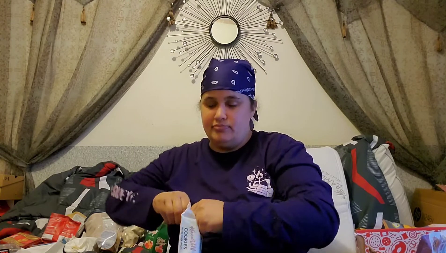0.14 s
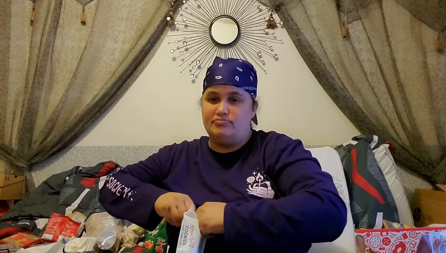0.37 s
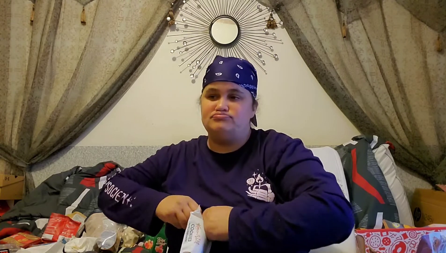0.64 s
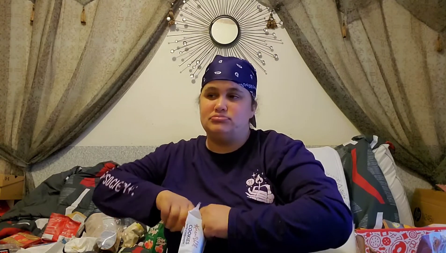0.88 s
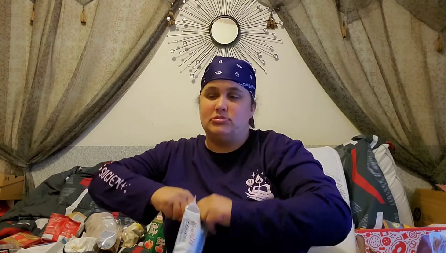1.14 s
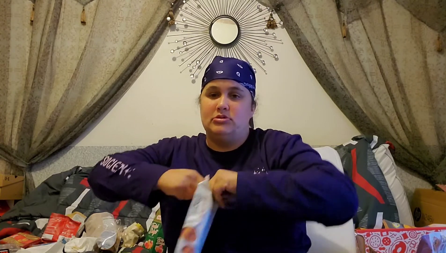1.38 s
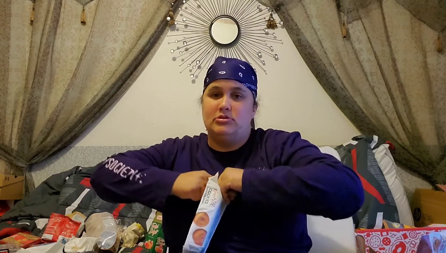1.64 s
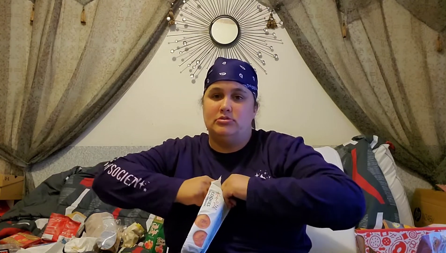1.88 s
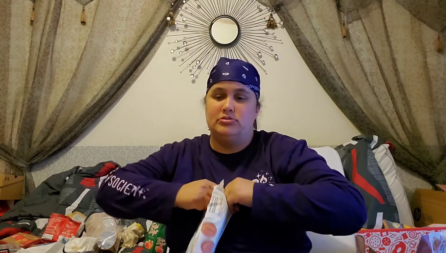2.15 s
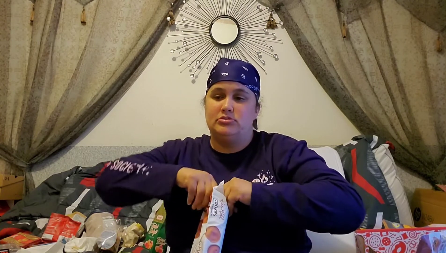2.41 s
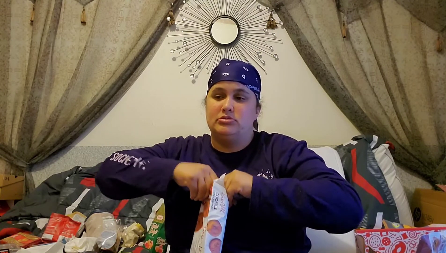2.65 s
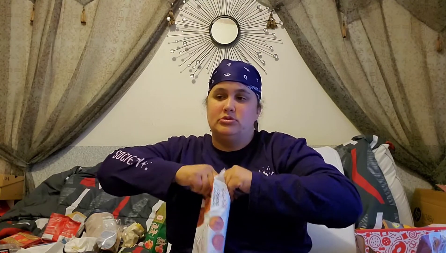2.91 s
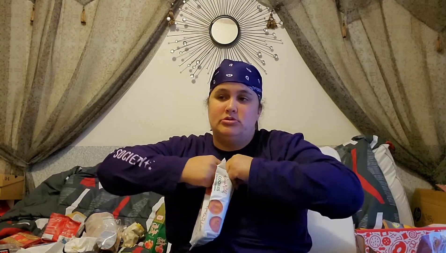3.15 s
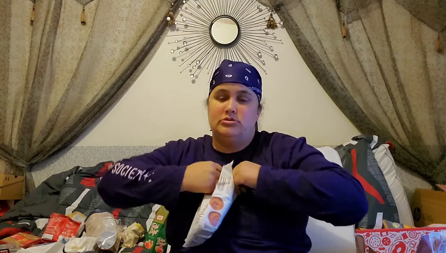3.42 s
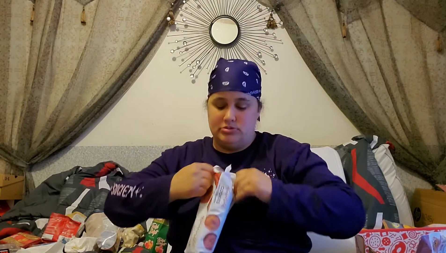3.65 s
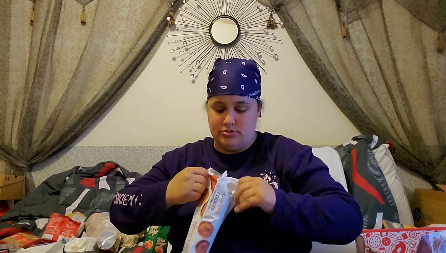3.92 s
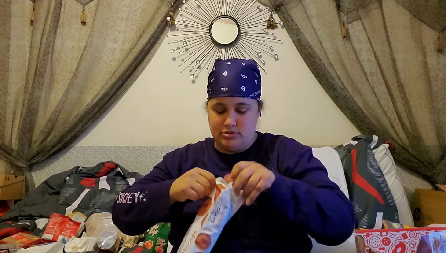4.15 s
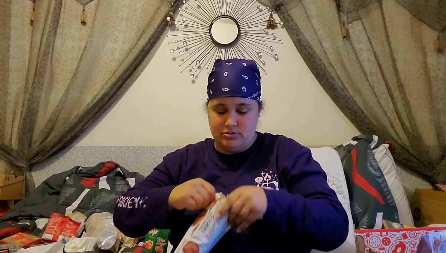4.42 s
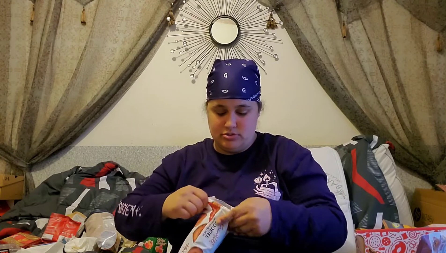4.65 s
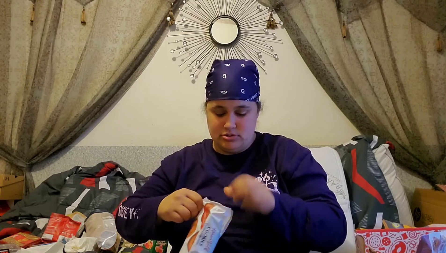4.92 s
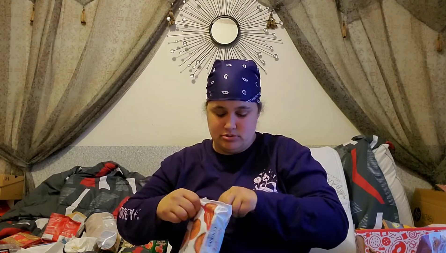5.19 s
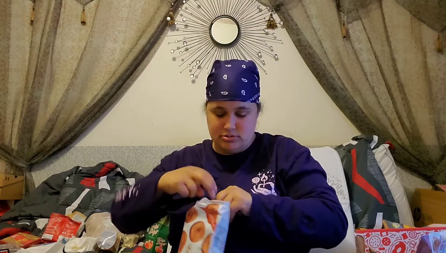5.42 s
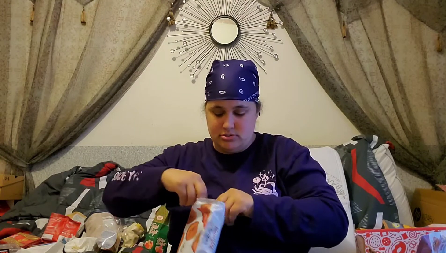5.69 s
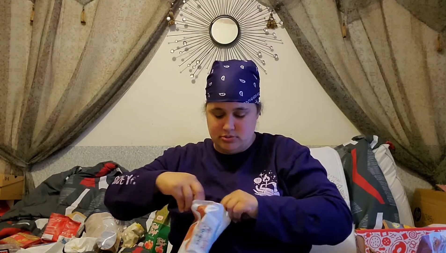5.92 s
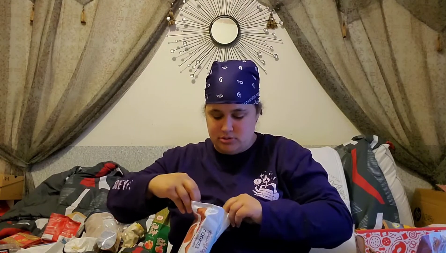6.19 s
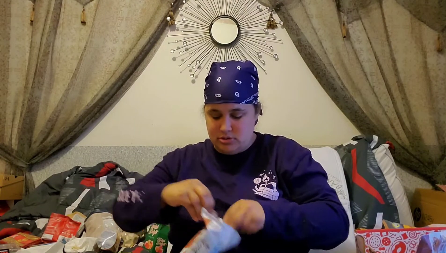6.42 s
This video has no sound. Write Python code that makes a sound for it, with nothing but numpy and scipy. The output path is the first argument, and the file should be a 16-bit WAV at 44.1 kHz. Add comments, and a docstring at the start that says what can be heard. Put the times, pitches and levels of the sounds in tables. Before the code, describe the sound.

Two hands work a crisp plastic snack bag close to small stereo microphones in a quiet, soft-furnished room. From 0 to 1 s, light rustling is broken by hard snaps near 0.25, 0.6 and 0.9. After a brief lull, crinkling thickens from 1.15 s, with bright crackles around 1.4 to 1.5 and a strong crack at 2.2. Rustle eases around 2.6 to 2.8, then a vigorous burst comes at 3.0 to 3.1, followed by dense, coarse crackling from 3.3 to 3.8. A near-pause at 3.9 leads to steady kneading and tearing until 4.95. Another gap falls around 5.05 to 5.2; crinkling resumes, dips at 5.5, and builds to sharp cracks around 6.0. It then thins to sparse, weak rustles by 6.5. Soft low pops of the bag wall recur throughout, with a short room tail, faint steady noise and a subdued, swelling deep rumble.

```python
"""Two hands knead, pull and tear a plastic snack bag in a quiet, curtained room.
Loud and small creases strike banks of short film resonances; loud ones also ring a freed panel.
Pops of the bag wall are low dying sines. A close surface echoes the bag and a diffuse tail follows it.
Below lie faint steady noise and a swelling rumble, both filtered noise."""
import sys
import numpy as np
from scipy import signal
from scipy.fft import rfft, irfft
from scipy.io import wavfile

SR = 44100
rng = np.random.default_rng(int(sys.argv[2]) if len(sys.argv) > 2 else 0)


def transcribe(signal):
    """Save signal, clipped to [-1, 1], as a 16-bit WAV file at the path in sys.argv[1]."""
    frames = np.atleast_2d(signal).T
    limited = np.clip(frames, -1, 1)
    pcm = np.round(limited * 32767).astype(np.int16)
    wavfile.write(sys.argv[1], SR, pcm)


def boost_factor(decibels):
    """Convert a level in decibels to a linear amplitude factor."""
    exponent = np.asarray(decibels, float) / 20
    return 10 ** exponent


N = 289275

# loud crease snaps: t/s, level/dB, panel ring f/Hz, bright tick re snap/dB, aftershock crackle re snap/dB
SNAPS = [(0.024, -18, 1470, -3, -28), (0.075, -31, 1420, -13, -27), (0.14, -28, 6630, 3.5, -17),
         (0.195, -24, 1480, -24, -20), (0.208, -26, 1380, -24, -23), (0.228, -9, 2490, -23, -25),
         (0.255, -7, 4340, -18, -23), (0.343, -26.5, 1010, -10, -39), (0.382, -29.5, 1490, -17, -33),
         (0.427, -29.5, 1500, -26, -33), (0.489, -30, 2890, -17, -22), (0.54, -22.5, 1500, -17, -30),
         (0.57, -29, 3970, -18, -14), (0.584, -12.5, 1580, -22, -18.5), (0.643, -10.5, 3000, -24, -27),
         (0.673, -25, 942, -20, -23), (0.7, -23, 2250, -23, -31), (0.769, -35, 1390, -19, -25),
         (0.786, -23.5, 1500, -27.5, -21.5), (0.853, -27, 4060, -19, -18),
         (0.905, -12.5, 1470, -11.5, -27.5), (0.934, -17.5, 4420, -19, -13.5), (1.054, -34, 2390, -19, -41),
         (1.151, -27, 1510, -4.5, -12), (1.2, -26.5, 1090, -4, -14), (1.208, -23, 1090, -11, -15),
         (1.226, -27.5, 2470, -11, -18), (1.265, -22, 940, -17, -16.5), (1.328, -25, 1110, -15, -23),
         (1.351, -20.5, 3340, -12, -30), (1.397, -10.5, 5200, -13, -28.5), (1.405, -16, 5240, -5, -21),
         (1.442, -15.5, 930, -18, -18), (1.46, -22.5, 2260, -3, -21), (1.475, -10, 5600, -16, -22.5),
         (1.521, -17, 2250, -7.5, -18.5), (1.586, -28, 1920, -1, -11.5), (1.647, -17.5, 834, -6.5, -19),
         (1.679, -17, 880, -3.5, -19), (1.692, -17, 1990, -12, -33), (1.757, -18, 5100, -3.5, -28),
         (1.775, -19, 1220, -20, -23), (1.823, -21, 3050, -9.5, -19.5), (1.847, -19, 1150, -20, -31),
         (1.912, -25, 5300, -7, -33), (1.953, -29, 1800, -13, -30), (1.978, -13, 1800, -11, -23),
         (2.022, -21.5, 5960, -5, -21), (2.1, -39, 1300, -9, -23), (2.098, -22.5, 1560, -8, -23),
         (2.112, -20.5, 1830, -28, -31), (2.182, -25.5, 1480, -19, -14), (2.189, -24, 1230, -18, -23),
         (2.198, -18.5, 2270, -22, -15.5), (2.229, -6, 2280, -30, -17.5), (2.285, -22.5, 4200, -5, -19),
         (2.316, -18.5, 1250, -10, -17.5), (2.328, -13.5, 1020, -27, -19.5), (2.334, -15, 576, -5, -23),
         (2.377, -20, 2720, -1, -29), (2.43, -13.5, 2490, -6.5, -19), (2.512, -18.5, 2300, -30, -14.5),
         (2.53, -11.5, 2130, -19.5, -15.5), (2.598, -18.5, 2200, -47, -14), (2.718, -25, 2350, -19, -35),
         (2.808, -30, 2430, -19, -26), (2.858, -28, 3120, -8, -17), (2.871, -22, 5580, -10, -20.5),
         (2.881, -24.5, 2180, -14, -19), (2.892, -23, 1120, -16, -21), (2.92, -22, 2250, -15, -24),
         (2.956, -32, 1400, 2, -15), (2.991, -19, 1400, -11, -33), (3.003, -12.5, 1200, -45, -24),
         (3.024, -15.5, 1160, -29, -24), (3.044, -14.5, 1740, -19, -19.5), (3.077, -4.5, 3460, -29, -22.5),
         (3.128, -15.5, 2300, -44, -24), (3.179, -25.5, 1250, -5, -29.5), (3.238, -24.5, 5310, -5, -18.5),
         (3.271, -17, 2130, -14, -18), (3.314, -20, 1020, -4, -20.5), (3.341, -10, 990, -32, -15.5),
         (3.478, -21.5, 580, -5, -20), (3.494, -19.5, 1030, -18, -23), (3.512, -19, 985, -18, -10),
         (3.54, -14.5, 3170, -12, -17.5), (3.558, -18, 1450, -14, -39), (3.611, -19, 1110, -22, -19),
         (3.63, -23, 4150, -21, -30), (3.69, -25, 1450, -19, -23), (3.748, -18.5, 1290, -17, -21),
         (3.752, -16.5, 614, -12, -19), (3.782, -18, 2450, -10, -17), (3.797, -10, 1140, -18, -24),
         (3.816, -14, 1110, -7, -36), (3.916, -34.5, 920, -9, -23), (3.961, -48, 1460, -19, -29),
         (4.039, -17, 1170, -21, -23), (4.055, -24, 1470, -12, -17), (4.111, -15.5, 2750, -18, -26),
         (4.155, -18, 4100, -10, -24.5), (4.191, -22.5, 3400, -30, -33), (4.245, -29, 5100, -7, -13.5),
         (4.272, -27, 2130, -18, -29), (4.352, -18, 2330, -9, -24.5), (4.364, -18.5, 2340, -10, -22),
         (4.41, -15.5, 3100, -8, -25.5), (4.42, -19.5, 2590, -1.5, -31), (4.471, -16, 2070, -26, -33),
         (4.5, -19, 1210, -7, -17), (4.526, -16, 2300, -13, -20), (4.568, -11.5, 620, -22, -26),
         (4.619, -20, 2220, -1.5, -22), (4.64, -19, 2220, -20, -16), (4.697, -17, 2240, -13, -20.5),
         (4.734, -24, 1230, -12, -14), (4.746, -15.5, 1210, -17, -22), (4.766, -18.5, 1290, -15, -32),
         (4.86, -15.5, 2150, -18, -27), (4.879, -17, 2310, -28, -11), (4.934, -21, 1320, -22, -22),
         (4.95, -17, 1860, -34, -19.5), (4.992, -29, 1460, -30, -30), (5.087, -37, 6340, -4.5, -23),
         (5.208, -23, 1200, -20, -21.5), (5.247, -18.5, 4250, -26, -24), (5.253, -18.5, 4080, -25, -16),
         (5.292, -18.5, 2290, -18, -16.5), (5.327, -17, 2270, -19, -15), (5.349, -15.5, 1190, -27, -17),
         (5.39, -18.5, 1260, -17, -22.5), (5.418, -15, 1210, -13, -23), (5.46, -17, 910, -18, -23.5),
         (5.546, -34, 1310, -27, -23), (5.607, -28.5, 2230, -8, -21.5), (5.639, -23, 4220, -15, -19),
         (5.651, -26, 2020, 1, -15), (5.691, -16.5, 2070, -34, -23), (5.702, -16, 1180, -14, -21),
         (5.749, -15, 1470, -7.5, -27.5), (5.787, -25, 5130, -8, -18), (5.828, -17, 1230, -24, -17.5),
         (5.838, -15, 1310, -24, -28), (5.885, -15, 4360, -14, -23), (5.915, -27, 1030, -8, -23),
         (5.98, -13, 3230, -29, -19.5), (5.994, -10, 1190, -25, -18), (6.023, -7.5, 894, -31, -16),
         (6.062, -14, 1200, -14, -17.5), (6.099, -19.5, 2200, -7, -19), (6.11, -17.5, 1890, -17, -17.5),
         (6.179, -28, 2240, -21, -36), (6.198, -25.5, 1040, -27, -35), (6.229, -32, 2420, -15, -17),
         (6.258, -22, 1220, -26, -33), (6.383, -22, 1100, -37, -22), (6.465, -25, 1240, -21, -21),
         (6.543, -30.5, 2440, -17, -16)]
# bag wall pops, pushing the air inside: t/s, level/dB, f/Hz
POPS = [(0.026, -28, 360), (0.192, -36, 430), (0.254, -40, 444), (0.426, -40, 372), (0.543, -44, 366),
        (0.588, -24, 342), (0.674, -21, 347), (0.695, -23, 372), (0.91, -46, 363), (1.206, -35, 437),
        (1.414, -41, 350), (1.45, -35, 417), (1.477, -26.5, 375), (1.647, -36, 299), (1.678, -24.5, 385),
        (1.901, -36, 363), (2.024, -37, 363), (2.093, -28.5, 428), (2.182, -37, 370), (2.338, -33, 471),
        (2.534, -31, 385), (2.957, -51, 390), (3.0, -40, 386), (3.022, -27, 288), (3.043, -21.5, 374),
        (3.079, -22.5, 380), (3.127, -32, 400), (3.15, -41, 382), (3.215, -46, 420), (3.271, -26.5, 437),
        (3.342, -26, 422), (3.476, -28, 392), (3.516, -30, 418), (3.61, -31, 382), (3.755, -35, 398),
        (4.041, -45, 415), (4.271, -28.5, 385), (4.339, -30.5, 433), (4.384, -32, 385), (4.452, -35, 447),
        (4.568, -34, 390), (4.746, -30.5, 430), (4.873, -31, 427), (4.951, -33, 390), (5.117, -37.5, 369),
        (5.335, -29.5, 355), (5.46, -47, 393), (5.69, -25.5, 423), (5.838, -35, 395), (5.975, -39, 439),
        (6.025, -23.5, 385), (6.099, -25, 405), (6.16, -34, 363), (6.467, -41.5, 380)]
# left-right likeness: f/Hz, likeness/1
LIKENESS = [(150, 0.88), (350, 1), (640, 0.84), (1400, 0.59), (3100, 0.31), (6800, 0.043), (15000, 0.011)]

BANDS_HZ = np.geomspace(150, 15500, 38)
TRAVEL_S = 0.0005   # way to the microphones
SHORTEST_T60_S = 0.00097   # added to every film ring's decay
MIDDLE_HZ = 1800   # reference for ring pitch in octaves


def rms_one(x):
    """Scale to rms 1."""
    return x / np.sqrt(np.mean(x ** 2) + 1e-20)


def at_hz(points, hz):
    """Read a (Hz, value) table on a log-frequency axis."""
    table_hz, value = np.transpose(points)
    return np.interp(np.log(hz), np.log(table_hz), value)


def drift(rate_hz):
    """Slow random drift of rms 1: white noise through a two-pole low-pass."""
    r = np.exp(-2 * np.pi * rate_hz / SR)
    noise = rng.standard_normal(N + SR)
    return rms_one(signal.lfilter([1], [1, -2 * r, r * r], noise)[SR:])


def near(ring_hz, octaves):
    """Per snap and band: 1 on the ring, fading away from it."""
    return np.exp(-(np.log2(BANDS_HZ / ring_hz[:, None]) / octaves) ** 2)


def dying(s, power, t60_s, swell=0):
    """Power that jumps at the times s and decays; swell adds a share that builds up first."""
    r = boost_factor(-120 / (t60_s * SR))   # per-sample decay of power, not amplitude
    at = np.clip((s * SR).astype(int), 0, N - 1)
    fast = signal.lfilter([1], [1, -r], np.bincount(at, power, N))
    return fast + swell * signal.lfilter([np.e * (1 - r)], [1, -r], fast)


def rings(rows, rise_s):
    """Dying sines from rows of (t/s, level/dB, f/Hz, t60/s)."""
    out = np.zeros(N + SR // 5)
    t = np.arange(SR // 5) / SR
    for s, level_db, hz, t60_s in rows:
        at = max(round(s * SR), 0)
        envelope = boost_factor(level_db - 60 * t / t60_s) * (1 - np.exp(-t / rise_s))
        out[at:at + len(t)] += envelope * np.sin(2 * np.pi * hz * t)
    return out[:N]


def colour_db(push_db, crisp_db, tick_db):
    """Per snap and band: the bag push rules the bass, crispness the upper middle, the tick the treble."""
    bass = 1 / (1 + (BANDS_HZ / 520) ** 6)
    treble = 1 / (1 + (6800 / BANDS_HZ) ** 6)
    upper = 1 / (1 + (2400 / BANDS_HZ) ** 6) - treble
    return np.outer(push_db, bass) + np.outer(crisp_db, upper) + np.outer(tick_db, treble)


def film(times, band_db, cycles, scatter_db):
    """Each snap strikes a bank of short resonances; strength, sign and moment vary per band."""
    # what a snap sets ringing in film and bag: f/Hz, relative level/dB
    film_colour = [(150, -53), (220, -66), (380, -12), (520, -8.5), (750, -8.5), (1100, -5), (1670, -3.5),
                   (2300, 5.5), (3200, 3), (4200, 2.5), (5800, 5), (9000, -1.5), (12000, 5.5), (15000, 6)]
    slip_s = 0.002   # spread as a crease gives way: extra delay at two sigma
    draws = rng.standard_normal((len(times), 4, len(BANDS_HZ)))
    strength, sign, aside, late = np.moveaxis(draws, 1, 0)
    alike = np.clip(at_hz(LIKENESS, BANDS_HZ), 0, 0.99)
    size = boost_factor(band_db + at_hz(film_colour, BANDS_HZ) + scatter_db * strength)
    mid = np.sqrt(1 + alike) * np.sign(sign)
    side = np.sqrt(1 - alike) * aside
    at = (times[:, None] + TRAVEL_S + slip_s * (late / 2) ** 2) * SR
    at = np.clip(at.astype(int), 0, N - 1)
    out = np.zeros((2, N))
    for k, hz in enumerate(BANDS_HZ):
        r = boost_factor(-60 / ((cycles / hz + SHORTEST_T60_S) * SR))
        w = 2 * np.pi * hz / SR
        for ear, way in enumerate((1, -1)):
            blow = size[:, k] * (mid[:, k] + way * side[:, k])
            blows = np.bincount(at[:, k], blow, N) + 1e-18
            out[ear] += signal.lfilter([0, np.sin(w)], [1, -2 * r * np.cos(w), r * r], blows)
    return out


def hum():
    """Faint steady room noise and a swelling rumble in the lowest room modes: spectrally shaped noise."""
    # steady noise: f/Hz, relative density/dB per Hz
    noise_colour = [(30, 6), (120, 15), (210, 4), (380, -36), (700, -13.5), (1000, -27), (3000, -24),
                    (9000, -46), (15000, -39)]
    # deep rumble of the room and seat: t/s, level/dB
    rumble_levels = [(0.0, -58), (0.4, -72), (1.19, -54), (2.19, -69), (2.26, -57), (2.48, -63),
                     (2.83, -68), (2.92, -72), (3.03, -54), (3.82, -64), (5.02, -57.5), (5.08, -65),
                     (5.75, -56.5), (5.83, -67), (6.08, -51), (6.56, -66)]
    # rumble modes: f/Hz, width/Hz, relative level/dB
    rumble_modes = [(55.7, 20, -3), (82.8, 16, 0.5), (35, 29, -21), (154, 73, -5)]
    noise_db, alike = -71.5, 0.88
    hz = np.fft.rfftfreq(N, 1 / SR) + 1
    modes = sum(boost_factor(db) / np.abs(1 + 2j * (hz - centre_hz) / width_hz) ** 2
                for centre_hz, width_hz, db in rumble_modes)
    s, level_db = np.transpose(rumble_levels)
    rumble_db = np.interp(np.arange(N) / SR, s, level_db)
    out = 0
    for colour, db in ((boost_factor(at_hz(noise_colour, hz)), noise_db), (modes, rumble_db)):
        mid, side = irfft(rfft(rng.standard_normal((2, N))) * colour, N)
        stereo = np.sqrt(1 + alike) * mid + np.sqrt(1 - alike) * side * [[1], [-1]]
        out = out + boost_factor(db) * rms_one(stereo)
    return out


def tail():
    """Diffuse tail per ear: octave bands of noise, each with its own decay, most alike in the bass."""
    # decay of the room: f/Hz, t60/s
    room_t60 = [(200, 0.1), (600, 0.16), (2000, 0.1817), (6000, 0.21), (15000, 0.2)]
    t = np.arange(SR // 3) / SR
    out = 0
    for hz in 125 * 2.0 ** np.arange(8):
        shared, own = np.split(rng.standard_normal((3, len(t))), [1])
        alike = np.clip(at_hz(LIKENESS, hz) - 0.1, 0, 1)
        edges_hz = [hz / np.sqrt(2), min(hz * np.sqrt(2), 0.45 * SR)]
        band = signal.butter(2, edges_hz, "band", fs=SR, output="sos")
        noise = signal.sosfilt(band, np.sqrt(alike) * shared + np.sqrt(1 - alike) * own)
        out = out + noise * boost_factor(-60 * t / at_hz(room_t60, hz))
    out = out * np.clip((t - 0.001) / 0.00064, 0, 1)   # silent for 1 ms, then a short ramp
    return out / np.sqrt(np.sum(out ** 2, axis=1, keepdims=True))


def room(x, count=10):
    """The hands move over the bag: each block of 1024 samples gets one of count tails at random."""
    spot = np.repeat(rng.integers(0, count, N // 1024 + 1), 1024)[:N]
    mono = x.mean(axis=0, keepdims=True)
    return sum(signal.fftconvolve(mono * (spot == k), tail(), axes=1)[:, :N] for k in range(count))


def bounce(x):
    """One close echo per ear off the surface under the microphones combs the sound."""
    delays_s, gains_db = [0.000937, 0.00088], [-12, -18]   # left, right
    n = np.arange(N)
    return np.array([ear + boost_factor(db) * np.interp(n - s * SR, n, ear, left=0)
                     for ear, s, db in zip(x, delays_s, gains_db)])


def pops():
    """Pops of the bag wall push the air inside: soft low rings, alike in both ears."""
    t60_s, rise_s = 0.038, 0.00055
    return rings([(s, level_db, hz, t60_s) for s, level_db, hz in POPS], rise_s)


def aftershocks():
    """A loud snap frees its neighbours: crackle power, and that power times brightness and octaves."""
    t60_s, swell = 0.093, 0.78
    s, level_db, ring_hz, tick_db, after_db = np.transpose(SNAPS)
    power = boost_factor(level_db + after_db) ** 2
    bright_db = 20.5 + 0.6 * tick_db   # takes on a share of the snap's tick
    octaves = np.log2(ring_hz / MIDDLE_HZ)
    return [dying(s, power * v, t60_s, swell) for v in (1, bright_db, octaves)]


def crackle():
    """Small creases snap at random and in clumps, driven by kneading and aftershocks; sizes vary."""
    # steady work of the hands: t/s, crackle level/dB, brightness re crackle/dB
    kneading = [(0.0, -41, 8), (0.2, -48, 5), (0.45, -49.5, 7), (0.7, -42.5, 2.5), (1.05, -40.5, -1),
                (1.25, -38, 2.5), (1.45, -41.5, -0.5), (2.1, -42.5, 1), (2.41, -39, 2.5), (2.63, -45.5, 6),
                (2.89, -49, 1), (3.05, -37.5, 8.5), (3.23, -43, 7.5), (3.4, -32, 0), (3.69, -37, 5.5),
                (3.82, -40.5, -2), (4.05, -45.5, 2), (4.58, -39.5, 1), (4.79, -41.5, 5.5), (4.99, -65, -5),
                (5.21, -47.5, -4), (5.35, -51, 0), (5.94, -41.5, 0), (6.41, -48.5, -1), (6.56, -67, -8)]
    # the grip slackens, crackle drops: middle t/s, length/s, depth/dB (negative lifts)
    lulls = [(0.4, 0.059, 6), (0.743, 0.045, 16), (0.871, .03, 5), (1.043, 0.072, 8), (1.106, 0.042, 8),
             (2.06, 0.018, 7), (2.15, 0.034, 7), (2.491, .04, 14), (3.455, .05, 9), (3.67, 0.059, 11.5),
             (3.876, 0.14, 26), (4.216, .04, 14), (4.313, 0.036, 5), (4.857, 0.032, -3), (5.057, 0.082, 12),
             (5.517, 0.079, 11), (5.96, .03, 6.5), (6.31, 0.031, 6), (6.44, 0.023, 6)]
    snaps_per_s, size_spread_db, clumping_db = 1500, 4, 3.5
    push_base_db, pop_push_db, pop_push_t60_s = 4, -6.5, 0.79
    crisp_base_db, crisp_follows, crisp_db_per_octave = -0.5, 0.23, 0.5
    pull = 0.51   # share by which aftershocks lean to the pitch of their snap

    when, pick, size, pitch = rng.random((16000, 4)).T
    times = when * (N - 1) / SR
    at = (times * SR).astype(int)
    silent = pick > snaps_per_s * N / SR / len(times)
    size_db = size_spread_db * np.minimum(-np.log(size + 1e-9), 2.8) - 300 * silent
    clump_db = clumping_db * (drift(19.4) + 0.66 * drift(76.0))[at]

    s, knead_db, knead_bright_db = np.transpose(kneading)
    steady = boost_factor(np.interp(times, s, knead_db)) ** 2
    steady_bright_db = np.interp(times, s, knead_bright_db)
    after, after_bright, after_octaves = [v[at] for v in aftershocks()]
    power = steady + after
    bright_db = (steady * steady_bright_db + after_bright) / power

    # a pop leaves the bag wall loose for a while: more bass
    pop_s, pop_db, _ = np.transpose(POPS)
    loose = dying(pop_s, boost_factor(pop_db + pop_push_db) ** 2, pop_push_t60_s)[at]
    push_db = 10 * np.log10(boost_factor(push_base_db) ** 2 + loose / power)
    # higher rings free crisper aftershocks
    crisp_db = crisp_base_db + crisp_follows * bright_db + crisp_db_per_octave * after_octaves / power

    lull_db = sum(db * np.exp(-(2 * (times - mid_s) / length_s) ** 2) for mid_s, length_s, db in lulls)
    level_db = 10 * np.log10(power) - 19.5 + size_db + clump_db - lull_db
    band_db = level_db[:, None] + colour_db(push_db, crisp_db, bright_db)
    # every small crease favours a pitch of its own
    own_hz = 700 * 12 ** pitch
    lean_octaves = pull * (after_octaves - after * np.log2(own_hz / MIDDLE_HZ)) / power
    band_db = band_db + 7 * (near(own_hz * 2 ** lean_octaves, 0.32) - 0.3)
    return film(times, band_db, cycles=3.65, scatter_db=5.0)


def snaps():
    """The loud creases: a broad crack, and the freed panel of film rings at its own pitch."""
    s, level_db, ring_hz, tick_db, _ = np.transpose(SNAPS)
    colour = colour_db(np.full(len(s), -9.0), np.full(len(s), 1.5), tick_db + 15.5)
    band_db = level_db[:, None] - 17.5 + 5 * near(ring_hz, 0.42) + colour
    panel_t60_s = 13.9 / ring_hz + SHORTEST_T60_S
    panels = np.transpose([s + TRAVEL_S, level_db - 6, ring_hz, panel_t60_s])
    return film(s, band_db, cycles=9.3, scatter_db=3.0) + rings(panels, rise_s=0.0001)


def scene():
    """Bag with its room tail, high-passed at 250 Hz and echoed by the close surface, over the hum."""
    film_sound = snaps() + crackle()
    air = pops()
    bag = film_sound + air + boost_factor(-0.5) * room(film_sound + boost_factor(-10.0) * air)
    bag = signal.sosfilt(signal.butter(6, 250, "high", fs=SR, output="sos"), bag)
    return bounce(bag) + hum()


def housing(x):
    """Peaks and dips of the small microphones' case: resonators in series."""
    # housing resonances: f/Hz, width/Hz, gain/dB
    case_modes = [(385, 74, 3), (1480, 116, 5.5), (1644, 76, -11), (3960, 350, 2.5), (5200, 220, 1.5),
                  (6760, 81, 3)]
    for hz, width_hz, db in case_modes:
        x = x + (boost_factor(db) - 1) * signal.lfilter(*signal.iirpeak(hz, hz / width_hz, SR), x)
    return x


def low_pass(x):
    """Removes everything above the highest recorded frequency."""
    return signal.sosfilt(signal.butter(12, 16800, fs=SR, output="sos"), x)


def record(dry):
    """The housing colours the sound, peaks are rounded, and the top drops steeply."""
    cutoff_hz, above_cut_db = 15550, -14
    x = 0.9 * np.tanh(housing(dry) / 0.9)
    low = signal.ellip(8, 0.3, 30, cutoff_hz - 80, fs=SR, output="sos")
    below = signal.sosfiltfilt(low, x)
    top = signal.butter(16, cutoff_hz + 700, fs=SR, output="sos")
    above = signal.sosfiltfilt(top, x - below)
    return low_pass(below + boost_factor(above_cut_db) * above)


dry = scene()
out = record(dry)
transcribe(out)
```